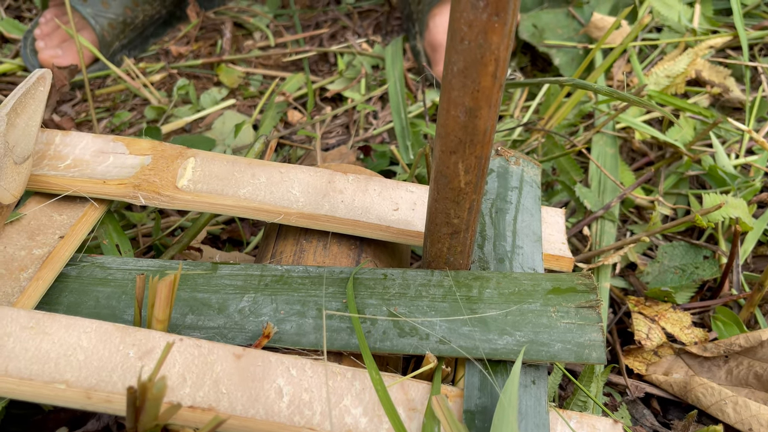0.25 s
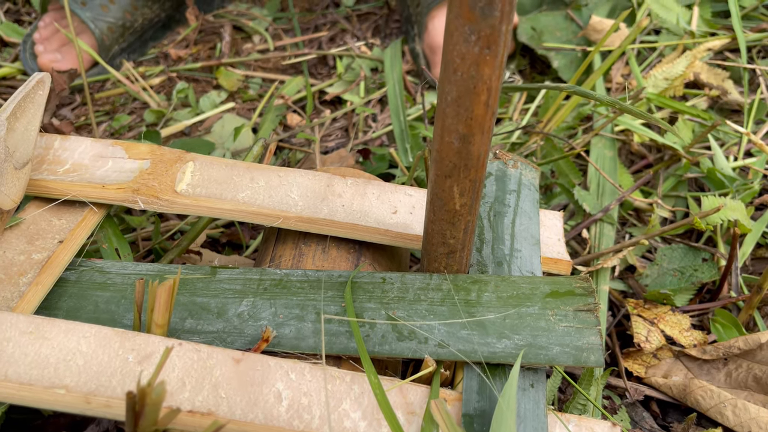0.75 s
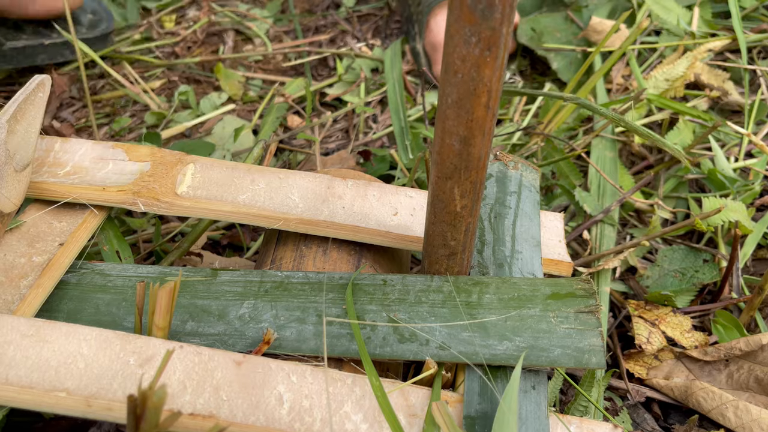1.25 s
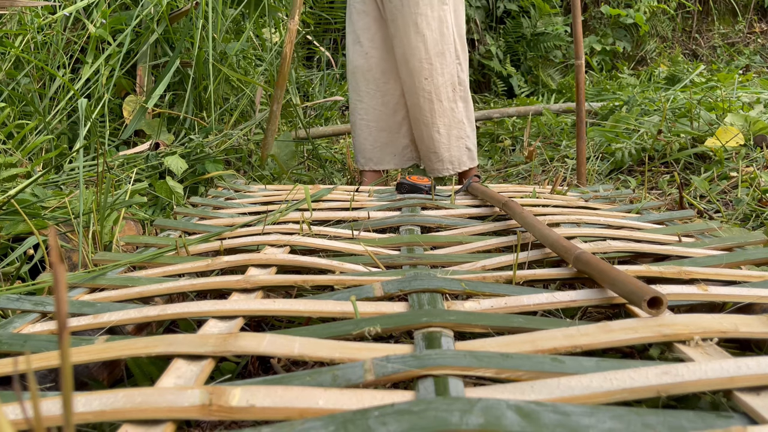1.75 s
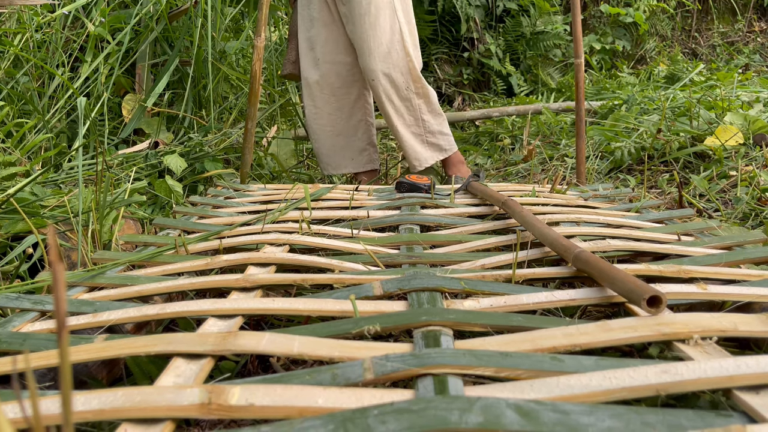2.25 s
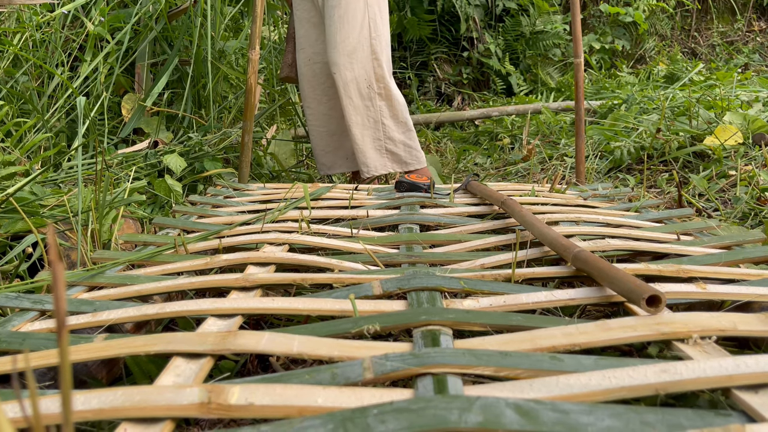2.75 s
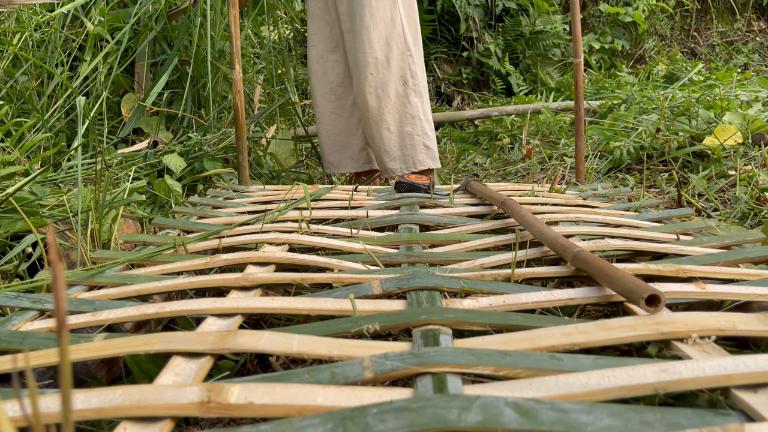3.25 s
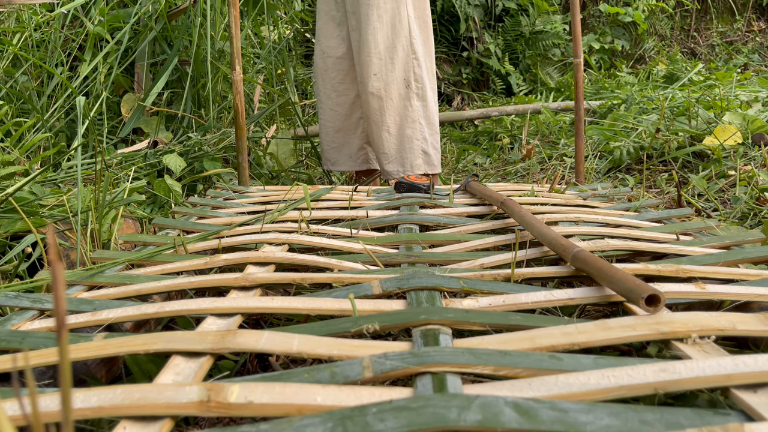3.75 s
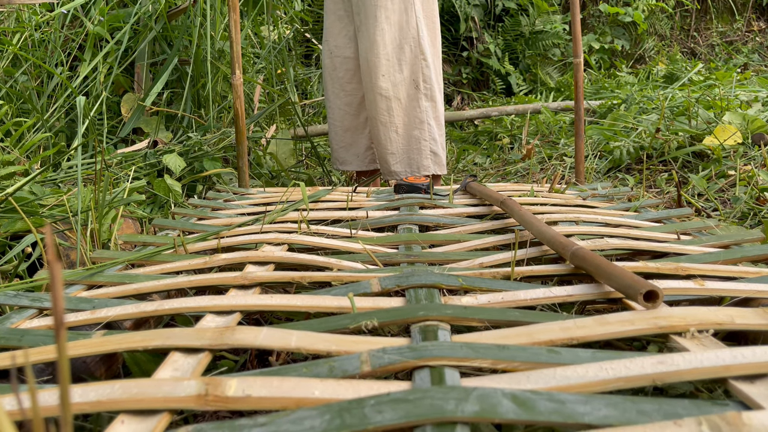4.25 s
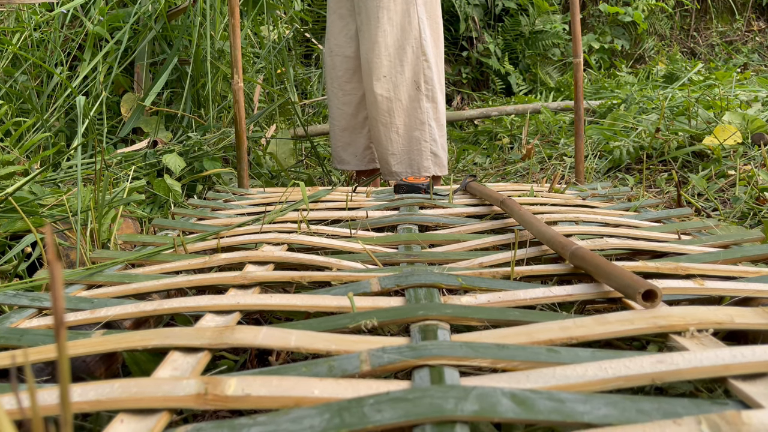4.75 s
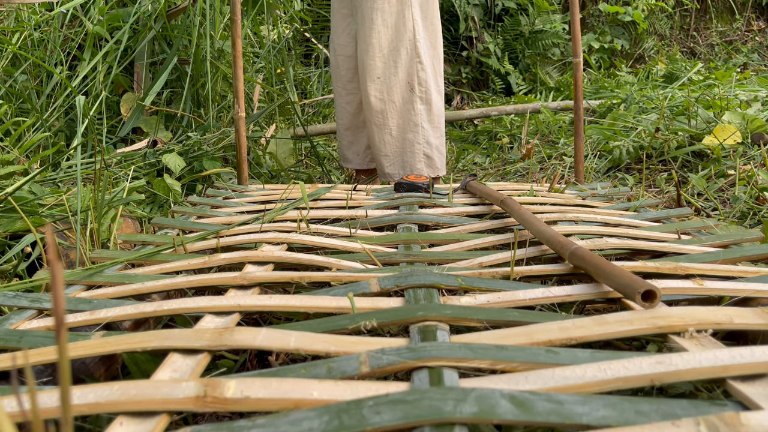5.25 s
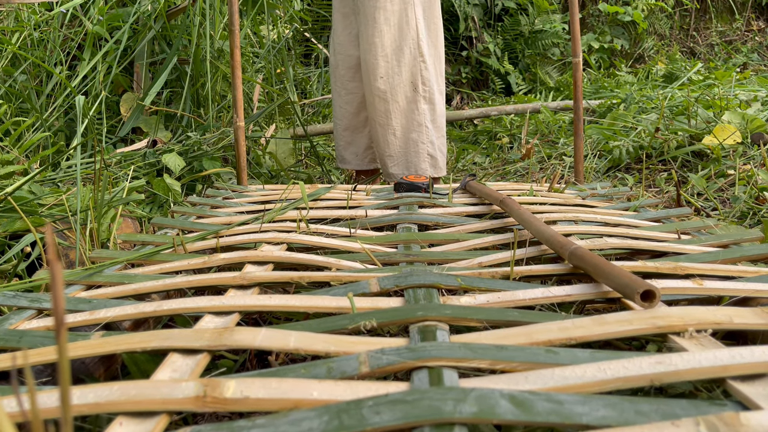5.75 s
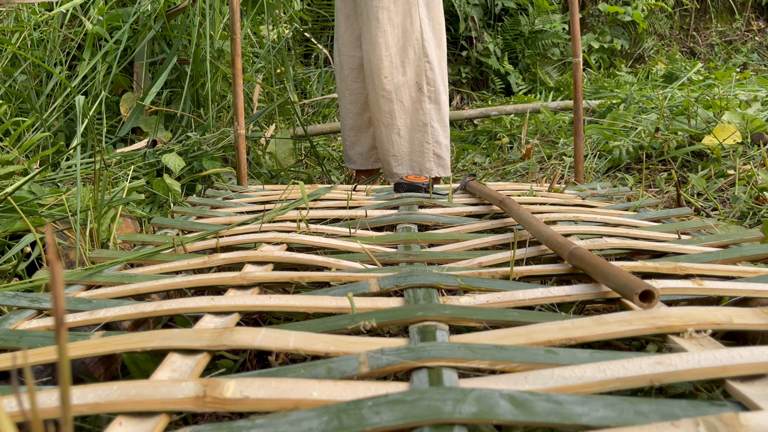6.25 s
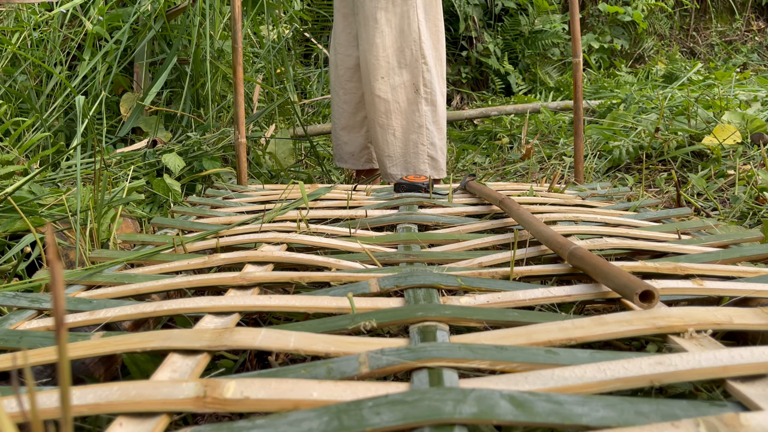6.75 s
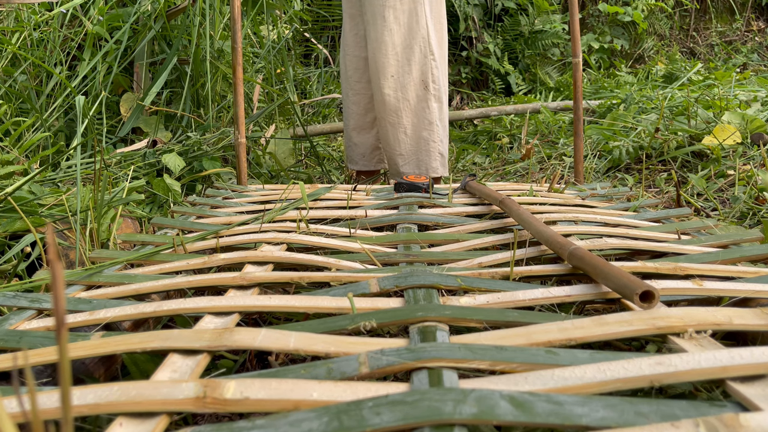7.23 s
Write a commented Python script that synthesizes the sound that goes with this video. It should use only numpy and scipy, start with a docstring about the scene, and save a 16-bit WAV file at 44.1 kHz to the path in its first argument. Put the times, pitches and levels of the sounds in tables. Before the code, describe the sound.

Outdoors in undergrowth, a wooden club hits a bamboo stake twice, very close, each blow a crunchy crack, short hollow ring and low thud. The perspective jumps to the far end of a woven bamboo deck: louder insect hiss, scattered footsteps rattling slats, then seven spaced blows. The first clatter loosely, later ones ring firmer. A small bird gives paired chirps.

```python
"""At the edge of a woven bamboo deck, a wooden club drives bamboo stakes into soft ground.
Two close blows come first; then, from the far end of the deck, scattered steps and seven more blows.
Each blow mixes crackling noise, short decaying tones and a low thud; far blows and steps also shake the slats.
Filtered noise makes the air, the hissing insects and a few leaf rustles; sliding tones make a small bird's chirps."""
import sys
import numpy as np
from scipy import signal
from scipy.fft import rfft, irfft, next_fast_len
from scipy.io import wavfile
from scipy.ndimage import uniform_filter1d, minimum_filter1d

SR = 44100
rng = np.random.default_rng(int(sys.argv[2]) if len(sys.argv) > 2 else 0)


def transcribe(u):
    """Save the signal u as a 16-bit wav file named by the first command-line argument.

    u: samples, shape (n,) or (channels, n), limited to [-1, 1]; the rate is SR.
    q: integer samples, one column per channel.
    """
    v = np.clip(np.atleast_2d(u).T, -1, 1)
    q = np.round(v * 32767).astype(np.int16)
    wavfile.write(sys.argv[1], SR, q)


N = 330309

# club blows: t/s, stake pitch f/Hz, strength level/dB, how firmly the stake is seated (0-1),
# crack level/dB relative to the strength
BLOWS = [(0.0280, 1567, -0.5, 1, -18), (0.5966, 1567, -0.5, 1, -16.5), (3.8413, 1434, -3, 0, -28.5),
         (4.4050, 1456, 0, 0.07, -26.5), (4.8841, 1467, 1.5, 0.33, -19), (5.4639, 1483, -3, 0.53, -23.5),
         (6.0936, 1540, 1, 0.53, -29), (6.717, 1493, 2.5, 0.86, -21.5), (7.3623, 1542, 3.5, 0.91, -24.5)]
# feet on the deck: t/s, rattle level/dB, roll of the foot/s, treble level/dB, bass level/dB,
# pitch of the slat underfoot f/Hz
STEPS = [(1.979, -46.5, .009, -24.5, 4.5, 215), (2.487, -52, 0.0017, 9, 4.5, 510),
         (2.570, -55, 0.0043, -10, -4, 610), (2.675, -57, 0.051, -5, 6, 417),
         (2.835, -48, .0045, -16, -10, 560), (2.879, -43, 0.034, -9.5, -0.5, 720),
         (3.204, -67.5, 0.0086, -10, 15, 120), (3.467, -53.5, 0.0047, -20, 7.5, 199.6),
         (4.261, -46.5, 0.0061, 0, 1, 337), (4.810, -64, .003, 13.5, -10, 500),
         (4.847, -47, 0.036, 0.5, -16, 485), (6.906, -65, 0.017, -15, 21, 220)]
# colour of splitting fibres and of a slat's snap: f/Hz, relative level/dB per Hz
CRACK_COLOUR = [(300, -2.5), (1000, 9), (2000, 1), (3500, -2), (6000, -4.5), (8500, -11.5), (10500, -22),
                (13000, -31.5), (15000, -24.5), (16500, -38)]
# how alike left and right are (1 same, 0 unrelated, below 0 opposed): f/Hz, likeness
AIR_LIKENESS = [(60, 1), (290, 0.89), (700, 0), (3000, 0)]
BLOW_LIKENESS = [(100, 0.74), (400, .88), (900, 1), (1500, 0.67), (3000, -.1), (8000, -0.082)]

RING = np.arange(int(.6 * SR)) / SR   # time since the start of a short sound, s
SIDES = np.array([[.5], [-.5]])   # left and right halves of a level or phase difference
MOVE_S, MOVE_FADE_S = 1.525, 0.031   # the listening point jumps to the far end of the deck


def from_db(db):
    """Turn decibels into a gain."""
    return 10 ** (np.asarray(db) / 20)


def rms_one(x):
    """Scale to an rms (average strength) of 1."""
    return x / np.sqrt(np.mean(x ** 2) + 1e-20)


def at_hz(points, hz):
    """Read a table between its points, on a log-frequency axis."""
    known, values = np.transpose(points)
    return np.interp(np.log(np.maximum(hz, 1)), np.log(known), values)


def between(ends, share):
    """Go a share of the way from one value to another."""
    return ends[0] + (ends[1] - ends[0]) * share


def add(out, s, sound):
    """Mix a sound into a stereo track at time s."""
    start = max(round(s * SR), 0)
    out[:, start:start + sound.shape[1]] += sound[:, :N - start]


def dying(t60):
    """A fade that falls 60 dB in t60 seconds."""
    return from_db(-60 * RING / t60)


def pair(mid, side, alike):
    """Two unrelated signals make a left and a right of given likeness."""
    alike = np.clip(alike, -1, 1)
    return np.sqrt(1 + alike) * mid + np.sqrt(1 - alike) * side * np.array([[1], [-1]])


def noise(spectrum, likeness, size):
    """Stereo noise of a given colour, shaped pitch by pitch; rms 1."""
    hz = np.arange(size // 2 + 1) * SR / size
    mid, side = rfft(rng.standard_normal((2, size)))
    coloured = pair(mid, side, at_hz(likeness, hz)) * from_db(at_hz(spectrum, hz))
    return rms_one(irfft(coloured, size))


def wavering(hz, width_hz):
    """A narrow resonance whose strength and phase wander; rms 1."""
    keep = np.exp(-np.pi * abs(width_hz) / SR)
    drift = signal.lfilter([1], [1, -keep], rng.standard_normal((2, 2 * len(RING))))
    drift = drift[:, -len(RING):]   # leave out the filter's start
    phase = 2 * np.pi * hz * RING
    return rms_one(drift[0] * np.cos(phase) + drift[1] * np.sin(phase))


def knocks(per_s, plus_minus_db):
    """Contacts at random moments, of uneven strength."""
    return (rng.random(N) < per_s / SR) * from_db(rng.uniform(-plus_minus_db, plus_minus_db, N))


def foliage(x, t60, dull_hz, build_s):
    """Leaves and stems scatter a thin, dull tail, different on each side."""
    tail = rng.standard_normal((2, len(RING))) * dying(t60) * (1 - np.exp(-RING / build_s))
    tail = signal.sosfilt(signal.butter(1, min(dull_hz, .4 * SR), fs=SR, output="sos"), tail)
    return signal.fftconvolve(x, rms_one(tail) / np.sqrt(len(RING)), axes=1)[:, :N]


def undergrowth():
    """Soft moving air and a steady chorus of insects are coloured noise, both louder at the far end."""
    # colour of the air: f/Hz, relative level/dB per Hz
    air_colour = [(20, -24.5), (35, -6), (55, 1), (110, -3.5), (250, -8), (500, -11.5), (1000, -15),
                  (2000, -19.5), (4000, -21.5), (9000, -32), (12000, -46.5), (16000, -50)]
    # colour of the insects, peaking at their pitches: f/Hz, relative level/dB per Hz
    insect_colour = [(3150, -28.5), (3420, -10.5), (3650, -18.5), (4100, -16.5), (5050, 0), (5600, -8),
                     (6300, -13), (7050, -2), (7330, 5.5), (7600, -4.5), (8300, 0), (8520, -7.5),
                     (8700, -20.5), (9800, -21.5), (11000, -39.5)]
    moved = np.clip((np.arange(N) / SR - MOVE_S) / MOVE_FADE_S + .5, 0, 1)
    # levels in dB: (beside the near stake, at the far end)
    air_gain = from_db(between((-71.5, -66), moved))
    insect_gain = from_db(between((-73.5, -62), moved))
    size = next_fast_len(N, True)
    air = air_gain * noise(air_colour, AIR_LIKENESS, size)[:, :N]
    return air + insect_gain * noise(insect_colour, AIR_LIKENESS, size)[:, :N]


def crack(contact_s, splinter_db, splinter_t60):
    """Fibres crunch while the club presses on them, and crackle on briefly."""
    force = (RING / contact_s) ** 2 * np.exp(2 - 2 * RING / contact_s)
    crackle = from_db(splinter_db) * dying(splinter_t60) * (1 - np.exp(-RING / contact_s))
    return noise(CRACK_COLOUR, BLOW_LIKENESS, len(RING)) * (force + crackle)


def stake(modes, pitch_hz, ring_db, body_db, overtone_db, build_s, press_s, ring_pan_db, body_pan_db, tube_db):
    """A blow sets the stake's modes (its own tones) ringing; the soil damps them quickly."""
    # faint lasting ring of the hollow tube: f/Hz, relative level/dB, t60/s
    tube_modes = [(1471, -43.5, 0.12), (1580, -49, .18), (2790, -40.5, .22), (4060, -48.5, 0.22)]
    out = np.zeros((2, len(RING)))
    main_hz = max(modes, key=lambda mode: mode[1])[0]   # the strongest mode
    for k, (hz, db, t60, lead) in enumerate(modes):
        detune = 1 + rng.normal(0, 0.0054)   # the club never lands twice on the same spot
        fall = dying(t60)
        if hz < main_hz:
            blow_db, rise, pan_db = body_db, .0013, body_pan_db
            hz = hz * detune
        elif hz == main_hz:   # the main ring swells and holds while the club is in contact
            blow_db, rise, pan_db = ring_db, build_s, ring_pan_db
            hz = pitch_hz
            fall = np.minimum(fall / np.interp(press_s, RING, fall), 1) / 2
        else:
            blow_db, rise, pan_db = overtone_db, .0016, ring_pan_db
            hz = hz * detune * pitch_hz / main_hz
        wave = (-1) ** k * np.sin(2 * np.pi * hz * RING + lead * SIDES)
        onset = 1 - np.exp(-(RING / rise) ** 2)
        out += from_db(db + blow_db + pan_db * SIDES) * wave * fall * onset
    for hz, db, t60 in tube_modes:
        tone = np.array([wavering(hz, width_hz=78) for side in range(2)])
        out += from_db(db + tube_db) * tone * dying(t60) / 2
    return out


def thud(hz, t60, sag, bump_db, bump_hz, bump_s):
    """The stake stops against the soil with a bump; the ground bounces, sinking in pitch."""
    phase = 2 * np.pi * np.cumsum(hz * (1 + sag * np.exp(-RING / 0.017))) / SR
    bounce = -np.sin(phase) * dying(t60) * (1 - np.exp(-(RING / 0.014) ** 2))
    stop = 2 * np.pi * bump_hz * (RING - bump_s)
    bump = from_db(bump_db) * stop * np.exp(-stop ** 2 / 2)
    return (bounce - bump) * np.ones((2, 1))


def club(hz, t60, lead):
    """The club's own short, woody note is one quickly dying tone."""
    return np.sin(2 * np.pi * hz * RING + lead * SIDES) * dying(t60) * (1 - np.exp(-RING / 0.00051))


def near_blow(pitch_hz):
    """The near stake rings, thuds into the soil and sounds the club."""
    # near stake's modes: f/Hz at rest, relative level/dB, t60/s, phase by which left leads/rad
    near_modes = [(172.4, -14, 0.027, 0), (360, -19.5, 0.018, -4.5), (440, -10.5, 0.024, -0.8),
                  (824, -6, 0.016, -1), (1159, -1.5, 0.016, 0.33), (1249.3, -5.5, 0.026, -0.9),
                  (1567, -1, 0.018, 0.1), (1731, -11, 0.012, 2.5), (2110, -10.5, .018, -1.5),
                  (2340, -16, 0.023, 1), (2618, -26, .022, 2.5), (3270, -11, 0.018, -1),
                  (3956, -22.5, 0.033, 1.5), (4650, -20.5, 0.02, 1), (5560, -21, 0.028, -2)]
    blow = stake(near_modes, pitch_hz, ring_db=4, body_db=2, overtone_db=2,
                 build_s=0.0014, press_s=0.0037, ring_pan_db=-0.5, body_pan_db=2.0, tube_db=0)
    blow += from_db(-5) * thud(hz=65.8, t60=.095, sag=.5, bump_db=-10, bump_hz=220, bump_s=0.0072)
    return blow + from_db(-18.5) * club(hz=945.6, t60=0.013, lead=.5)


def far_blow(pitch_hz, seated):
    """A loose far stake passes the blow on to the deck; a seated one rings and thuds instead."""
    # far stake's modes: f/Hz at rest, relative level/dB, t60/s, phase by which left leads/rad
    far_modes = [(208, -27.5, 0.033, 0.15), (339.4, -16, 0.042, 0.33), (526, -13, 0.018, 0.9),
                 (720, -13, 0.016, 0.9), (874, -17, 0.017, 0.95), (1493, -3, 0.019, 3.55),
                 (1860, -15, 0.025, 0.5), (2620, -6, 0.028, 3.84), (2840, -11.5, 0.0072, 2),
                 (3620, -29, 0.043, 2.5), (5750, -15, 0.013, 2.7), (6970, -25.5, 0.021, 3.8),
                 (7970, -31.5, 0.0091, 2.3)]
    # pairs are levels in dB: (loose, seated)
    blow = stake(far_modes, pitch_hz, ring_db=between((-6.5, 3), seated), body_db=-4.5,
                 overtone_db=between((-10.5, -2), seated), build_s=0.00094, press_s=0.0065,
                 ring_pan_db=-2.0, body_pan_db=2.5, tube_db=between((-20, 4), seated))
    thud_gain = from_db(between((-37.5, -14.5), seated))
    blow += thud_gain * thud(hz=78.0, t60=0.062, sag=0.82, bump_db=-1.5, bump_hz=230, bump_s=0.0072)
    return blow + from_db(between((-50, -8.5), seated)) * club(hz=967, t60=.021, lead=0.96)


def pounding():
    """Every blow is a crack, a ring and a thud, first from the near stake and then from the far end."""
    near, far = np.zeros((2, 2, N))
    for s, pitch_hz, db, seated, crack_db in BLOWS:
        touch = s - .0012   # the frayed top is crushed before the stake moves
        crack_gain = from_db(db + crack_db)
        if s < MOVE_S:
            add(near, touch, crack_gain * crack(contact_s=0.0064, splinter_db=-6.5, splinter_t60=.075))
            add(near, s, from_db(db) * near_blow(pitch_hz))
        else:
            add(far, touch, crack_gain * crack(contact_s=0.0017, splinter_db=-1.5, splinter_t60=0.086))
            add(far, s, from_db(db) * far_blow(pitch_hz, seated))
    close_leaves = foliage(from_db(-26.5) * near + from_db(-25.5) * far, t60=0.11, dull_hz=5000, build_s=0.018)
    bushes = foliage(from_db(-53) * near + from_db(-45) * far, t60=.53, dull_hz=4000, build_s=.03)
    return near + far + close_leaves + bushes


def bird(sweep_hz, rise_s, length_s, waver):
    """Chirps slide up to a top pitch and linger, echoing in the trees; other birds add single notes."""
    # calls, each a pair of chirps: t/s, top pitch f/Hz, relative level/dB, gap to the second chirp/s
    calls = [(1.461, 3990, -52.5, .153), (1.923, 3960, -57.5, .15), (2.366, 4000, -61.5, 0.16),
             (2.820, 4065, -55.5, 0.15), (3.245, 3760, -58.5, 0.16), (5.518, 3860, -56, 0.14),
             (5.969, 4016, -53, .156), (6.410, 4040, -53.5, 0.14), (6.824, 4020, -52.5, 0.17),
             (7.236, 3715, -50.5, 0.1)]
    # single notes of other birds: t/s, length/s, f/Hz, relative level/dB
    single_notes = [(0.13, 0.62, 753, -79), (1.895, 0.031, 6500, -59.5), (3.691, 0.081, 2620, -71.5)]
    out = np.zeros((2, N))
    # the second chirp of a pair is 2 dB softer
    chirps = [(s + k * gap_s, hz, db - 2 * k) for s, hz, db, gap_s in calls for k in range(2)]
    for s, top_hz, db in chirps:
        if s < MOVE_S:   # heard only from the far end
            continue
        pace = rng.uniform(.9, 1.2)
        slide = np.sin(np.pi / 2 * np.minimum(RING / (rise_s * pace), 1))
        hz = top_hz - sweep_hz * (1 - slide)
        hz *= 1 + waver * rms_one(uniform_filter1d(rng.standard_normal(len(RING)), size=130))
        swell = np.sin(np.pi * np.minimum(RING / (length_s * pace), 1)).clip(0) ** .5
        swell *= (hz / top_hz) ** 2   # louder towards the top
        add(out, s, (from_db(db) * swell * np.sin(2 * np.pi * np.cumsum(hz) / SR))[None])
    for s, length, hz, db in single_notes:
        swell = np.sin(np.pi * np.minimum(RING / length, 1))
        add(out, s, (from_db(db) * swell * wavering(hz, width_hz=15))[None])
    return from_db(-3) * out + from_db(-5.5) * foliage(out, t60=0.32, dull_hz=6845, build_s=0.0075)


def leaves(crackles_per_s, plus_minus_db):
    """Dry leaves beside the near stake crinkle in soft swells of noise roughened by random contacts."""
    # leaf movements: t/s, length/s, level/dB
    shifts = [(0.8, 0.52, -71.5), (1.189, 0.19, -63.5), (1.22, 0.56, -68.5)]
    # colour of the crinkling: f/Hz, relative level/dB per Hz
    leaf_colour = [(300, -6.5), (800, -2.5), (1600, -3.5), (3000, -15.5), (6000, -15), (10000, -21.5),
                   (16000, -43)]
    out = np.zeros((2, N))
    keep = np.exp(-1 / (0.0055 * SR))   # each contact fades over a few milliseconds
    for s, length, db in shifts:
        contacts = knocks(crackles_per_s, plus_minus_db)[:len(RING)] + 1e-18
        grain = rms_one(signal.lfilter([1], [1, -keep], contacts))
        swell = np.sin(np.pi * np.minimum(RING / length, 1)) ** 2
        add(out, s, from_db(db) * swell * grain * noise(leaf_colour, AIR_LIKENESS, len(RING)))
    return out


def jolts(treble_db, bass_db, lag_s):
    """Steps and far blows shake the deck: rows of (t/s, level/dB, hold/s, treble level/dB, bass level/dB)."""
    loose_s, seated_s = 0.042, 0.0072   # how long the slats chatter at full strength
    rows = []
    for s, _, db, seated, _ in BLOWS:
        if s > MOVE_S:
            rattle_db = db + between((-24, -38), seated)   # (loose, seated)
            hold_s = loose_s * (seated_s / loose_s) ** seated
            rows.append((s + lag_s, rattle_db, hold_s, treble_db, bass_db))
    return rows + [step[:-1] for step in STEPS]


def shaking(hz):
    """How hard the deck moves at one pitch; after each jolt the motion holds, then dies away."""
    # how long the woven slats shake: f/Hz, t60/s
    deck_t60 = [(80, 0.59), (250, 0.43), (700, 0.19), (1500, 0.29), (8000, 0.1)]
    out = np.zeros((1, N))
    # shares rise from 0 at 500 Hz to 1 two octaves above or below
    treble, bass = np.clip([np.log2(hz / 500) / 2, np.log2(500 / hz) / 2], 0, 1)
    for s, db, hold_s, treble_db, bass_db in jolts(treble_db=-4.0, bass_db=-1.5, lag_s=0.0054):
        fall = np.minimum(from_db(-60 * (RING - hold_s) / at_hz(deck_t60, hz)), 1)
        level = from_db(db + treble * treble_db + bass * bass_db)
        add(out, s, level * (fall * (1 - np.exp(-RING / 0.0012)))[None])
    return out


def rustle(contacts_per_s, plus_minus_db, level_db):
    """The weave rubs and ticks at its many crossings: random ticks, shaken band by band."""
    # colour of the woven slats: f/Hz, relative level/dB per Hz
    deck_colour = [(45, -3.5), (80, -1.5), (140, 1), (230, 1), (340, -1.5), (500, -2.5), (800, -1.5),
                   (1200, -11), (2000, -17.5), (3500, -14.5), (7000, -22), (10000, -47), (15000, -65)]
    out = np.zeros((2, N))
    edges = 45 * 2 ** (np.arange(18) / 2)   # half-octave bands, Hz
    centres = np.sqrt(edges[1:] * edges[:-1])
    gains = from_db(at_hz(deck_colour, centres)) * np.sqrt(centres)
    gains /= np.linalg.norm(gains)
    ticks = knocks(contacts_per_s, plus_minus_db) * rng.standard_normal((2, 2, N)) + 1e-18
    for k, (hz, gain) in enumerate(zip(centres, gains)):
        band_filter = signal.butter(2, edges[k:k + 2], "band", fs=SR, output="sos")
        band = signal.sosfilt(band_filter, ticks[k % 2])
        out += gain * shaking(hz) * rms_one(pair(*band, at_hz(BLOW_LIKENESS, hz)))
    return from_db(level_db) * out


def clatter(knocks_per_s, level_db, pan_db):
    """Loose slats bounce on each other, each ringing at its own pitch."""
    # resonances of the slats: f/Hz, relative level/dB, t60/s
    slat_modes = [(220, -1.5, 0.059), (263, -8, 0.17), (324, -3, 0.13), (389, -1, 0.064), (475, -4, 0.018),
                  (560, 1.5, 0.059), (665, 0.5, 0.097), (747, 0, 0.044), (860, -1.5, 0.045),
                  (972, -6.5, 0.024), (1090, -35, 0.02)]
    out = np.zeros((2, N))
    for hz, db, t60 in slat_modes:
        hits = rms_one(knocks(knocks_per_s, plus_minus_db=4.0) * rng.choice([-1, 1], N)) * shaking(hz)
        lead = rng.normal(1.0, 0.56) * hz / 600
        ring = np.sin(2 * np.pi * hz * RING + lead * SIDES) * dying(t60)
        ring /= np.linalg.norm(ring[0])
        rung = signal.oaconvolve(hits, ring, axes=1)[:, :N]
        out += from_db(db + level_db + pan_db * SIDES) * rung
    return out


def slat_knocks(t60, partial_db, snap_t60, level_db):
    """A slat, trodden on or dropping back, hits the frame: a dry snap and short, inharmonic bending tones."""
    # lifted slats dropping back after a blow: t/s, relative level/dB, f/Hz
    drops = [(3.869, -27, 617), (3.892, -26.5, 860), (4.088, -54, 655), (4.445, -23.5, 875),
             (4.560, -46, 750), (4.634, -54.5, 663), (4.937, -25, 952), (5.492, -26, 336),
             (5.529, -32.5, 342), (6.108, -22, 360), (6.125, -27, 612), (7.395, -30, 690)]
    out = np.zeros((2, N))
    trodden = [(s, db + 4.5, hz) for s, db, *_, hz in STEPS]   # 4.5 dB above the step's rattle setting
    for s, db, hz in drops + trodden:
        tone = np.zeros((2, len(RING)))
        for k, ratio in enumerate([1, 1.37, 2.1]):
            wave = np.sin(2 * np.pi * hz * ratio * RING + 0.83 * SIDES)
            tone += from_db(k * partial_db) * wave * dying(t60 / ratio)
        snap = from_db(-18) * noise(CRACK_COLOUR, BLOW_LIKENESS, len(RING)) * dying(snap_t60)
        add(out, s, from_db(db + level_db) * (tone + snap))
    return out


def scene():
    """Background, blows, bird, leaves and rattling deck together."""
    around = undergrowth() + leaves(crackles_per_s=520, plus_minus_db=8)
    around += bird(sweep_hz=1792, rise_s=.024, length_s=0.033, waver=0.015)
    deck = rustle(contacts_per_s=1100, plus_minus_db=1.0, level_db=-6.0)
    deck += clatter(knocks_per_s=120, level_db=-12.5, pan_db=3.5)
    deck += slat_knocks(t60=0.058, partial_db=-18.5, snap_t60=0.066, level_db=-1)
    return pounding() + deck + around


def gain_control(x, threshold_db, slope, attack_s, release_db_per_s):
    """A hard blow turns the gain down; it creeps back over a few tenths of a second."""
    level_db = 20 * np.log10(np.abs(x).max(axis=0) + 1e-9)
    over_db = np.maximum(level_db - threshold_db, 0)
    recovery = release_db_per_s * np.arange(N) / SR
    held_db = np.maximum.accumulate(over_db + recovery) - recovery   # jumps up, slides down
    keep = np.exp(-1 / (attack_s * SR))
    return x * from_db(-slope * signal.lfilter([1 - keep], [1, -keep], held_db))


def record(dry):
    """Rumble is removed, the gain ducks after hard blows, a fast limiter flattens peaks, the top is cut."""
    dry = signal.sosfilt(signal.butter(2, 42, "high", fs=SR, output="sos"), dry)
    dry = gain_control(dry, threshold_db=-10.5, slope=.55, attack_s=.025, release_db_per_s=45.5)
    gain = np.minimum(1, 0.84 / (np.abs(dry).max(axis=0) + 1e-9))
    gain = uniform_filter1d(minimum_filter1d(gain, size=41), size=41)
    limited = dry * gain / (1 + (dry * gain) ** 8) ** (1 / 8)
    # 60 dB down from 17 kHz upwards
    return signal.sosfilt(signal.cheby2(14, 60, 17000, fs=SR, output="sos"), limited)


dry = scene()
out = record(dry)
transcribe(out)
```